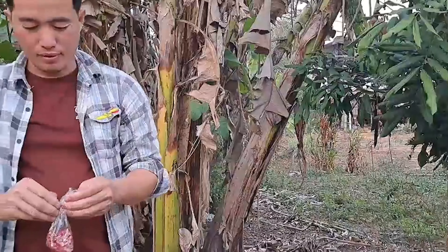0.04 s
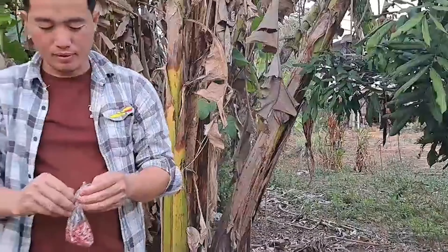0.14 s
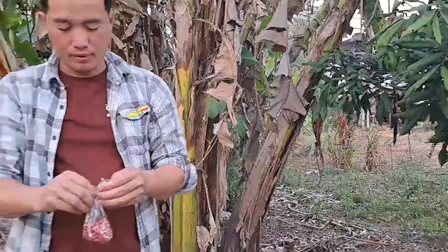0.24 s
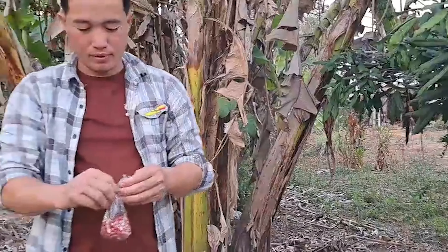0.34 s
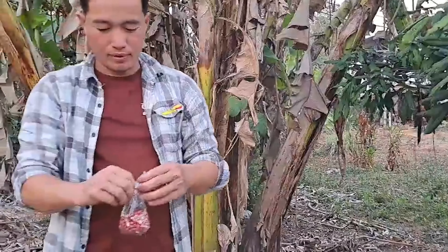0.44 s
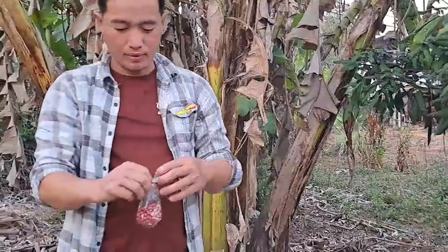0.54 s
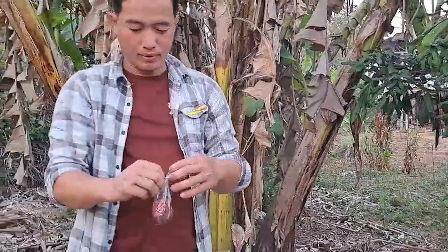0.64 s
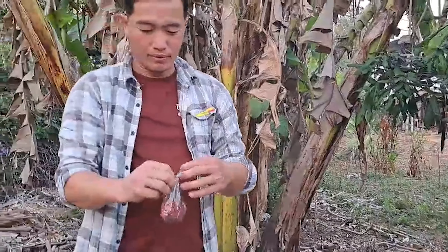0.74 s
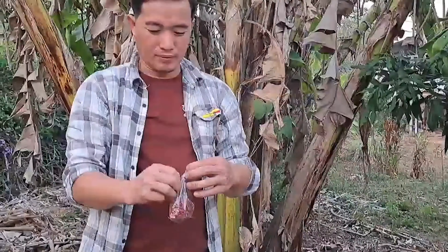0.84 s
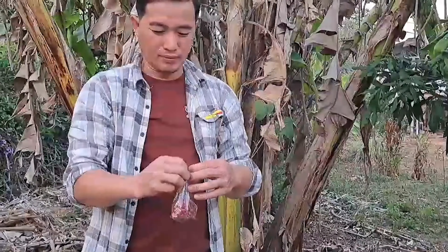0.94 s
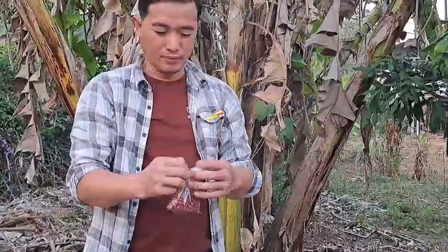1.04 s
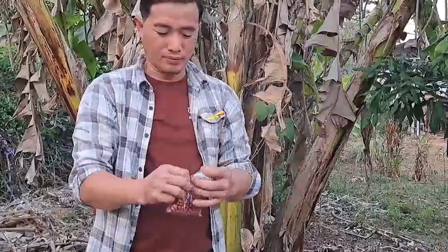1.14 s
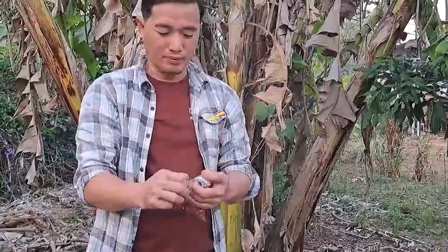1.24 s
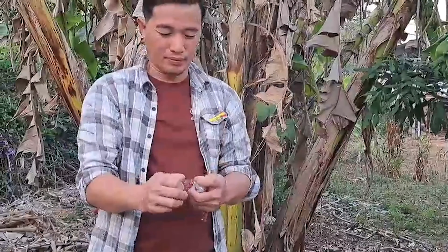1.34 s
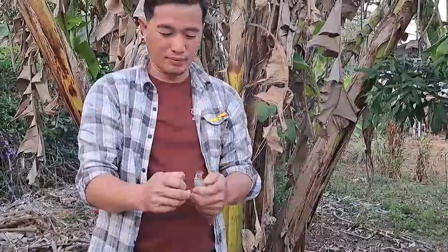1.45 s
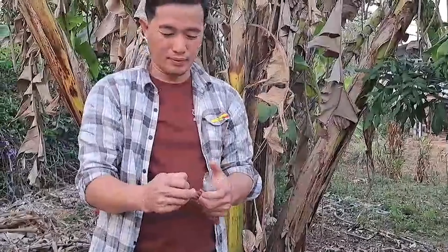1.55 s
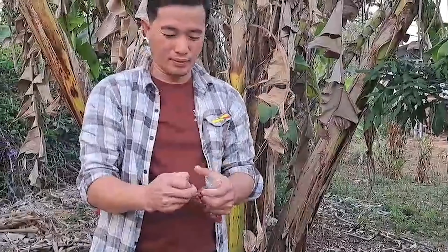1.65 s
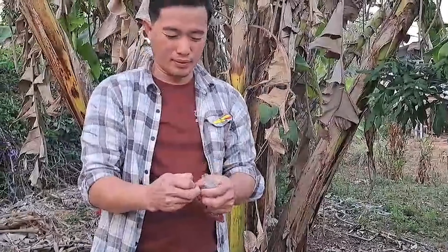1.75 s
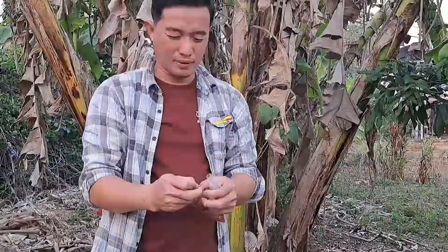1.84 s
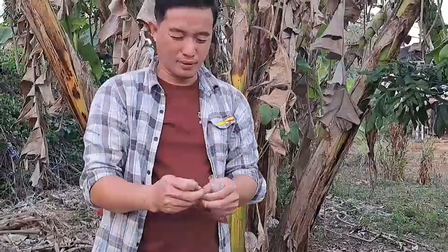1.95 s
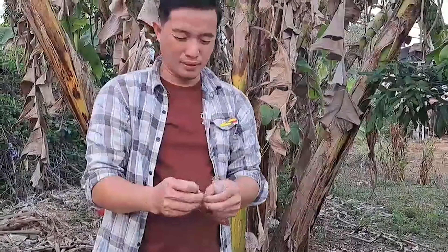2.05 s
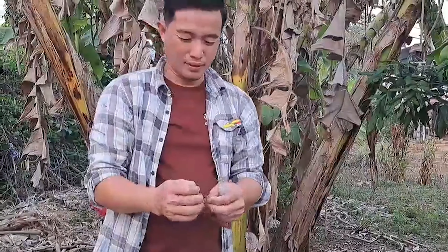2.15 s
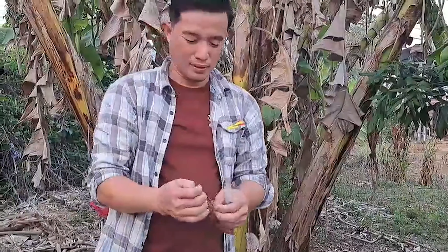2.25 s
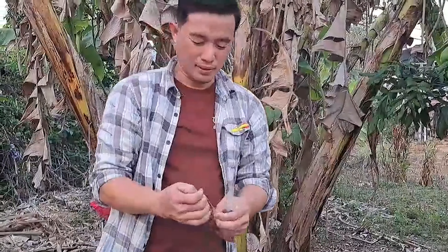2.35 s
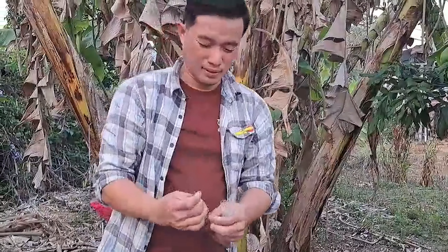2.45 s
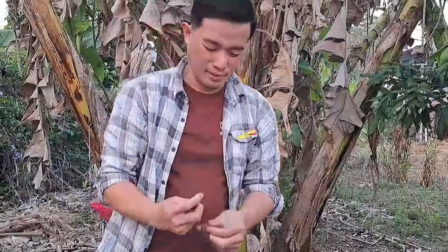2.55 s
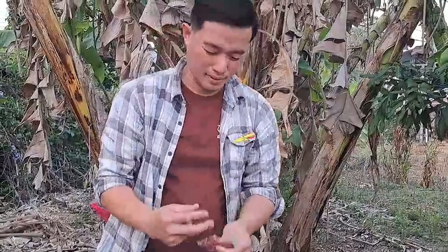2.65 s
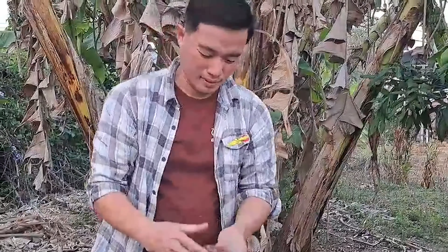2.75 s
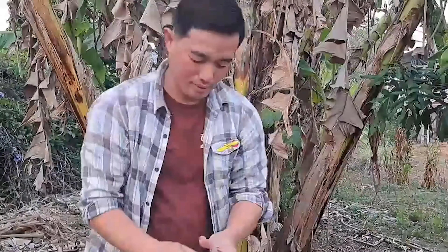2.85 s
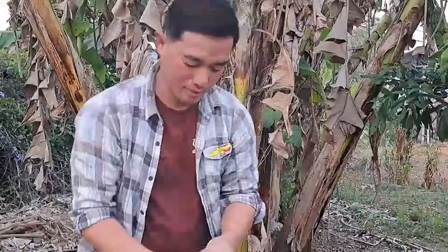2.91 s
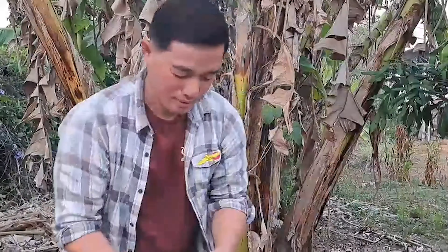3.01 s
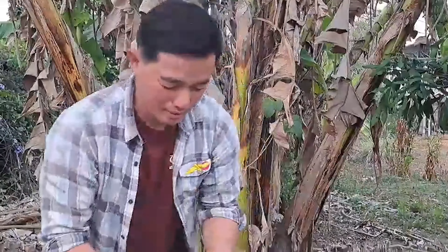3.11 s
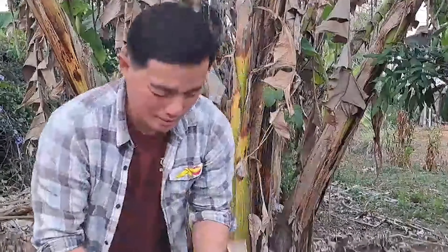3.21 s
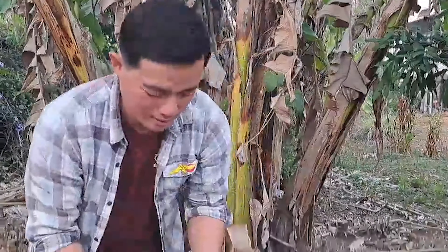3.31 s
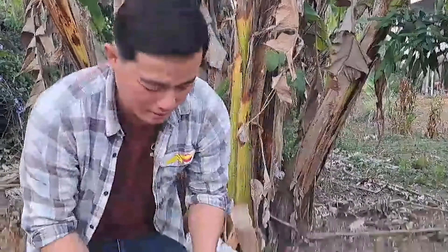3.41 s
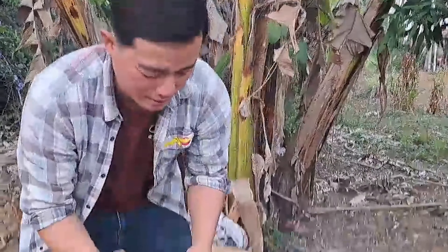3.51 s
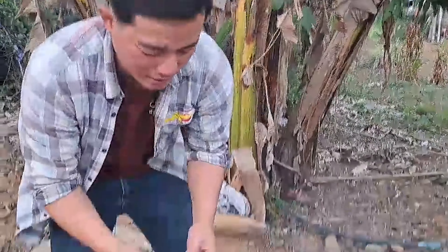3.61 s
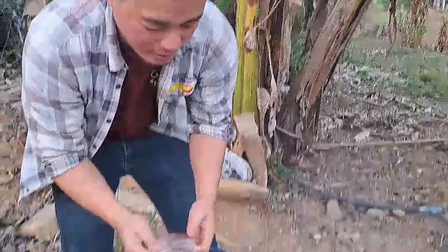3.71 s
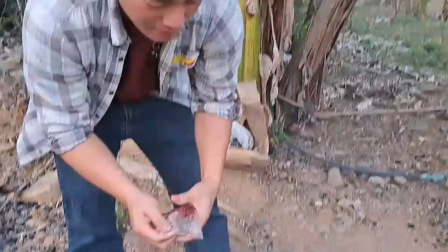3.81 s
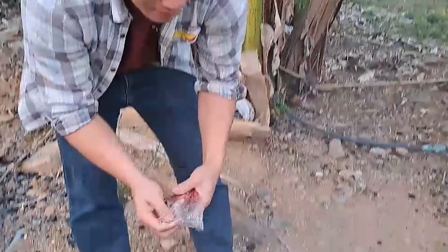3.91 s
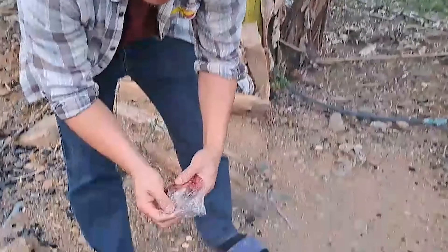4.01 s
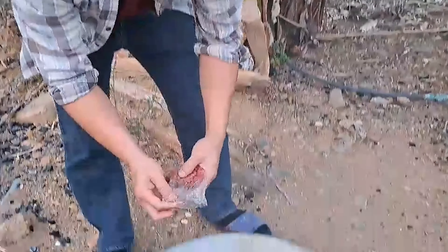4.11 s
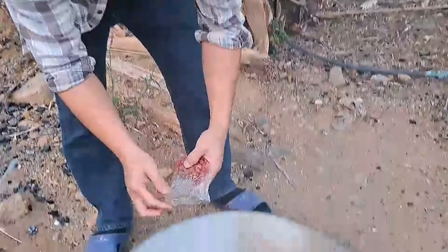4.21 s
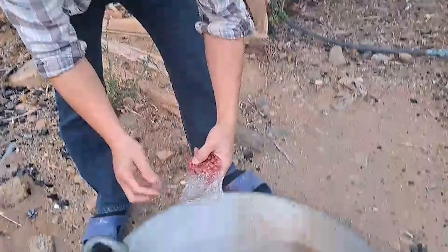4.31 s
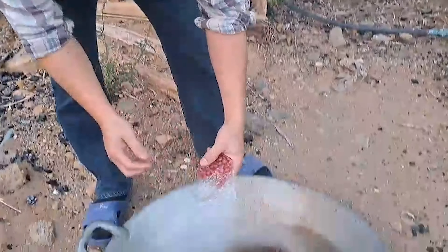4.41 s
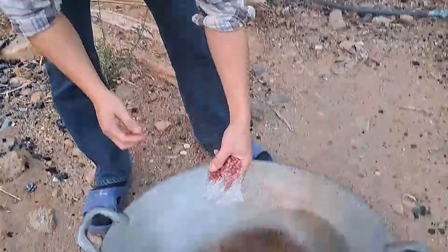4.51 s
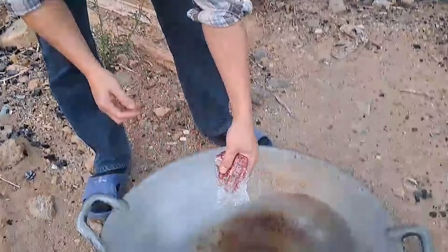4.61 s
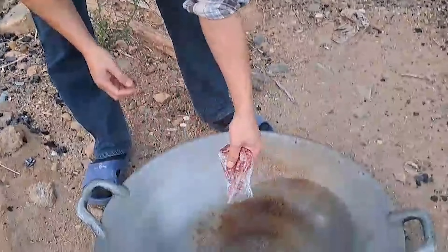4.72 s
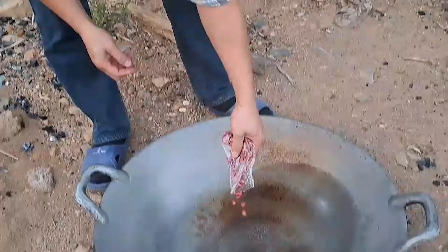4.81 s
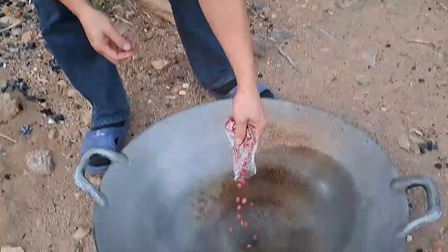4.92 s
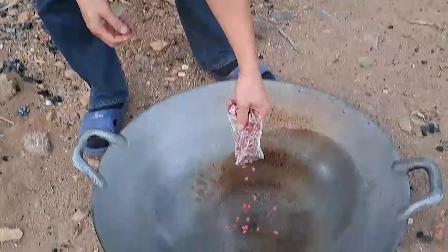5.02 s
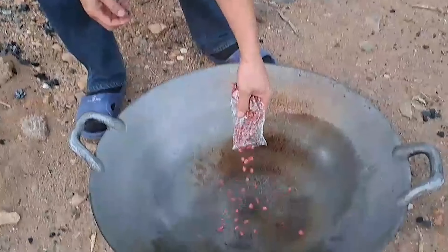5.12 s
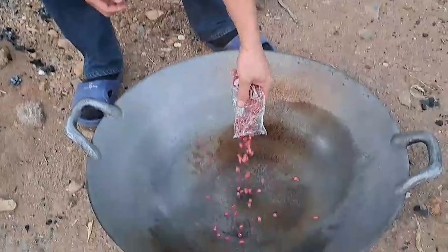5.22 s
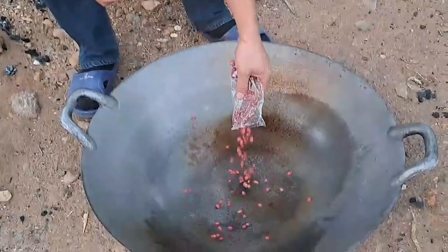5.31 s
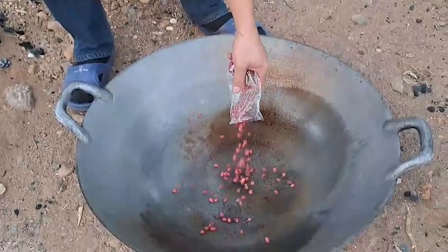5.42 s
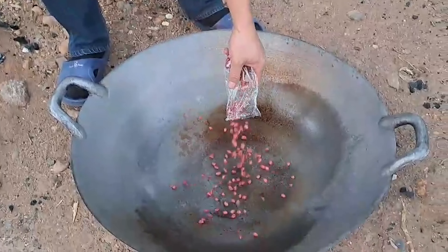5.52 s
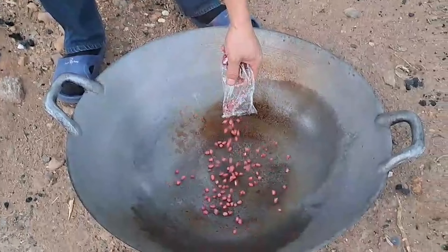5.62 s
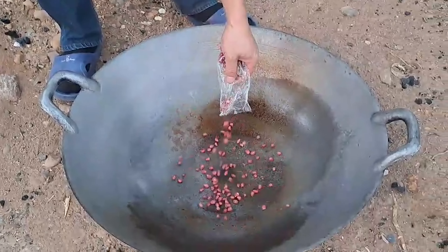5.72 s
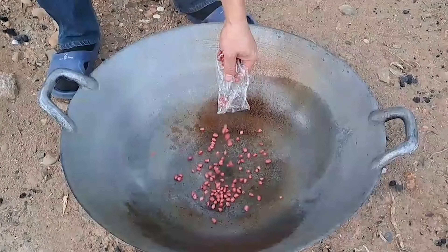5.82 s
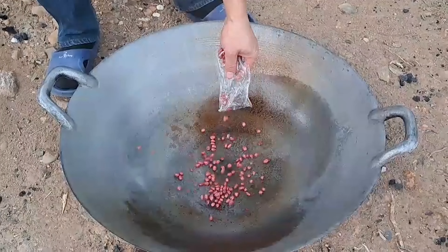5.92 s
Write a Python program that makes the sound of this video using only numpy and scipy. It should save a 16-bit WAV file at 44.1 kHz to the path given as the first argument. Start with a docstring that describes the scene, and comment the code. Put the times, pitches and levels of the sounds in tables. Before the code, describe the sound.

A quiet outdoor place with low distant traffic: a wavering engine drone, soft rumble and tyre hiss that fades after 1.5 s. Faint thin bird whistles glide at 0.6, 0.9 and 2.2 s. From the start, sleeves rustle and a thin plastic bag gives small dry snaps, busiest at 1.0-1.4 s, with a muted knock of nuts at 1.4 s. It calms around 2-2.7 s, then the shirt swishes dully from 2.9 s as the person bends. Crinkling grows closer and sharper from 3.8 s, peaking around 4.6-4.7 s with a nut knock; a faint husky hoot sounds at 4.7-4.9 s. At 5.0 s the first peanuts strike a large steel wok with hard, bright clanks, quickly becoming uneven gushes of bouncing hits. Clear metallic modes ring together over a faint bottom thud, slightly duller as nuts cover the steel, continuing until the end at 6 s.

```python
"""Peanuts poured into a wok

Outdoors, someone opens a small plastic bag, bends down and pours peanuts into a large steel wok.
Bag and clothes rustle as filtered noise that crinkles, snaps and knocks; then single nuts strike the pan
and swell to a stream of bouncing hits, each a noisy clank that also rings the pan's clear modes.
Wavering sines make a far engine drone and a short hoot, shaped noise makes air, rumble and fading road,
and gliding sines make a small bird's faint whistles."""
import sys
import numpy as np
from scipy import signal
from scipy.fft import rfft, irfft, next_fast_len
from scipy.io import wavfile

SR = 44100
rng = np.random.default_rng(int(sys.argv[2]) if len(sys.argv) > 2 else 0)


def generate_wav(sig):
    """Save sig (samples, or channels by samples) to the path in sys.argv[1] as 16-bit PCM at SR."""
    pcm = np.round(np.clip(np.atleast_2d(sig).T, -1, 1) * 32767).astype(np.int16)
    wavfile.write(sys.argv[1], SR, pcm)


N = 262766
TIME = np.arange(N) / SR

# Levels in the tables are relative: each source trims its layers with gains of its own.

# Movements of arms and hands. Each row: start in seconds, length in seconds, cloth level in dB,
# plastic film level in dB.
HAND_MOVES = [(0, 0.6, -52, -73), (0.439, 0.31, -60, -66), (0.857, 0.13, -54, -68),
              (1.035, 0.47, -50.5, -56), (1.347, 0.052, -44.5, -50.5), (1.545, .36, -57.5, -66),
              (2.18, 0.043, -74, -72), (2.596, .2, -63, -73), (2.801, 0.057, -54, -68),
              (2.858, 2.16, -47, -55), (2.897, 0.066, -44.5, -45), (3.075, 0.15, -46, -44.5),
              (3.301, 0.035, -55, -47), (3.466, 0.13, -46.5, -47), (3.543, .26, -42.5, -46.5),
              (3.837, 0.077, -46, -51), (4.083, 0.15, -44.5, -49), (4.288, 0.02, -46.5, -46.5),
              (4.55, 0.19, -42.5, -48.5), (4.635, 0.023, -42, -46), (4.774, 0.052, -39.5, -45)]
# The shirt swishes dully as its wearer bends down: start in seconds, length in seconds, level in dB.
BEND_SWISH = (2.87, 0.95, -53)
# Sharp creases of the bag. Each row: time in seconds, level in dB.
BAG_CREASES = [(0.2673, -47), (0.4876, -39), (0.5316, -40.5), (0.615, -41.5), (0.718, -39.5), (0.8994, -45),
               (1.035, -34.5), (1.1094, -34.5), (1.1471, -34), (1.1846, -34.5), (1.255, -34.5),
               (1.363, -34), (1.6044, -44), (1.6267, -42.5), (1.732, -41), (2.1944, -51.5), (2.4957, -50.5),
               (2.6803, -46), (2.8221, -42.5), (2.9974, -45), (3.2151, -41), (3.3265, -38), (3.4241, -48),
               (3.8452, -33), (3.9813, -36), (4.0652, -31.5), (4.2448, -35), (4.2832, -31.5), (4.313, -28),
               (4.4124, -31), (4.5052, -30.5), (4.5655, -38), (4.588, -26.5), (4.6143, -29), (4.6395, -26),
               (4.6602, -21), (4.6872, -22), (4.7857, -30), (4.8609, -27.5), (4.9048, -28)]
# Nuts knocking together inside the bag. Each row: time in seconds, level in dB.
BAG_KNOCKS = [(1.401, -22), (1.414, -30), (1.8755, -33.5), (4.166, -25.5), (4.72, -26.5)]
# Colours of cloth, plastic film and knocking nuts. Each row: frequency in Hz, density in dB per Hz.
CLOTH_COLOUR = [(250, 0), (450, -1), (1500, 2), (2500, 0), (4500, -15.5), (9000, -39.5)]
FILM_COLOUR = [(1200, -5), (2500, -2), (4200, 4), (7500, 3), (9200, -4), (12500, 0), (14000, 0),
               (15500, -32.5)]
NUT_KNOCK_COLOUR = [(300, -41), (1000, 6), (1900, 6), (3500, -0.5), (7000, -11), (15000, -13)]
# Far traffic. Each row: time in seconds, low engine boom in dB, rumble in dB.
TRAFFIC_LEVELS = [(0, -51, -50), (.75, -57, -50), (1.4, -54, -54), (2.45, -53.5, -59), (2.85, -55, -53),
                  (3.2, -51.5, -54.5), (3.65, -46, -52), (4.45, -45, -51.5), (4.95, -47, -47),
                  (5.96, -44.5, -51)]
# A far motor whose pitch dips, climbs and settles. Each row: time in seconds, pitch in Hz, level in dB.
MOTOR_GLIDE = [(0, 219, -50), (.2, 193.5, -50), (.45, 218, -55), (.7, 254.4, -52), (1.2, 242.8, -61.5),
               (2.4, 246, -68), (3.1, 247.1, -60), (5.96, 242.4, -58)]
# The engine's firing tone swells and sinks. Each row: middle in seconds, length in seconds, level in dB.
ENGINE_SWELLS = [(.75, 0.5, -48), (1.34, 0.42, -43.5), (3.67, .35, -52), (4.12, .5, -45.5),
                 (4.719, 0.49, -42), (5.55, 1.6, -43)]
# Colours of traffic rumble, open air and tyres. Each row: frequency in Hz, density in dB per Hz.
RUMBLE_COLOUR = [(25, -15), (45, 0.5), (90, 1), (180, -1), (250, -4.5), (340, -10), (500, -18.5),
                 (900, -28)]
AIR_COLOUR = [(200, -14.5), (400, -1), (700, 2.5), (1000, -5), (1500, -9), (3000, -23.5), (5000, -40),
              (14000, -32)]
ROAD_COLOUR = [(500, -16), (1000, 1.5), (1600, -1.5), (2300, -0.5), (3100, -12.5), (4500, -12),
               (6500, -23.5), (10000, -37)]
# Bird whistles. Each row: start in seconds, length in seconds, start pitch in Hz, end pitch in Hz,
# level in dB.
BIRD_WHISTLES = [(0.595, .19, 4400, 3700, -63), (0.878, 0.19, 3620, 4240, -63.5),
                 (2.173, 0.106, 6000, 5800, -72), (2.24, .1, 6640, 7140, -79)]
# A brief soft hoot. Each row: time in seconds, pitch in Hz, level in dB.
HOOT_GLIDE = [(4.66, 500, -90), (4.74, 503, -55), (4.8, 549, -49.5), (4.86, 582, -52), (4.94, 545, -90)]
# Nuts landing in the wok. Each row: time in seconds, strength in dB, treble against the low ring in dB.
LANDINGS = [(4.9921, -17.5, -6.5), (5.0131, -13, -7), (5.045, -11, -23), (5.0493, -15, 1.5),
            (5.0635, -14, -3.5), (5.0786, -14.5, -2.5), (5.092, -11, -8), (5.1319, -15.5, 3.5),
            (5.153, -12.5, -5.5), (5.1995, -18.5, 4.5), (5.2364, -20.5, -4), (5.2844, -13.5, -4),
            (5.2981, -13, 0), (5.3473, -11.5, -6.5), (5.3707, -22, -5), (5.386, -16, -3),
            (5.5051, -14, -10), (5.5208, -14, -32), (5.5474, -21, -15), (5.6222, -14, -5.5),
            (5.664, -15.5, -2.5), (5.6993, -11.5, -28), (5.772, -18, -15), (5.809, -21.5, 1),
            (5.9324, -15, -16)]
# The nuts leave the bag in gushes. Each row: start in seconds, length in seconds, level in dB.
NUT_GUSHES = [(5.039, 0.047, -30), (5.138, 0.19, -25), (5.346, .23, -19), (5.601, 0.24, -21),
              (5.828, 0.084, -23)]
# The wok's clearest modes. Each row: frequency in Hz, rms level in dB, 60 dB decay time in seconds.
CLEAR_MODES = [(1264, -32.5, .45), (1378, -44, .2), (1405, -39.5, .25), (1539, -33, .42), (1600, -45, .2),
               (1653, -48, .35), (1782, -46, .5), (1868, -43.5, .2), (2090, -44, .12), (2179, -43.5, .18),
               (2245, -43, .2), (2432, -46, .3), (2632, -45, .4), (2789, -50, .3), (2935, -42.5, .3),
               (3052, -47, .3), (3263, -46, .3), (3611, -48, .35), (3762, -47.5, .35), (3908, -46.5, .25),
               (4048, -49, .3), (4113, -49, .3), (4391, -45, .25), (4739, -43, .18), (5093, -46.5, .16),
               (5300, -48, .06), (6363, -49, .1), (6815, -54, .12), (7278, -57, .15), (7790, -55, .12)]
# The wok's crowd of short, overlapping modes. Each row: frequency in Hz, density in dB per Hz.
CLANK_COLOUR = [(1200, 1.5), (1450, 8), (1750, 0), (2200, 3), (2900, 1), (3500, -2.5), (5000, 3.5),
                (6500, -2.5), (8000, -7), (8900, -17.5), (10000, -15.5), (14000, -22)]
# The faint thud of the pan's bottom. Each row: frequency in Hz, density in dB per Hz.
THUD_COLOUR = [(180, -6), (280, 6), (400, -1), (600, -6), (900, -11.5)]
# Ring of the clear modes: gain in dB, phase spread between the ears in radians at the ring frequency.
MODE_RING = (3.4, .22)
# Left-right likeness of diffuse sound. Each row: frequency in Hz, correlation from -1 to 1.
EAR_LIKENESS = [(60, 0.96), (130, 0.94), (290, 0.88), (640, 0.45), (1400, 0.095), (3000, 0.25),
                (7000, 0.074), (15000, 0)]

MOVE_RISE_S, MOVE_FALL_DB_PER_S = 0.027, 215
FINGERS_DB = -79.5  # the film is never quite still in the hand
AIR_DB = -57.5  # steady murmur of the open air
# tyre noise sinks slowly, then fast once the vehicle has gone by
ROAD_DB, ROAD_SINK_DB_PER_S, ROAD_GONE_S, ROAD_FADE_DB_PER_S = -51, 4, 1.46, 36
GUSH_RISE_S, GUSH_FALL_DB_PER_S = 0.016, 220
# the treble of the bounces dulls as nuts cover the steel
BARE_PAN_TREBLE_DB, DULLING_DB_PER_S = 0, 5
RING_HZ = 1195  # ring frequency of the curved shell
CUTOFF_HZ = 14250


def from_db(db):
    """Decibels to an amplitude factor."""
    return 10 ** (np.asarray(db) / 20)


def rms_one(x):
    """Scales a sound to rms 1."""
    return x / np.sqrt(np.mean(x ** 2) + 1e-20)


def in_time(rows):
    """Each column of a curve, sample by sample."""
    s, *columns = np.transpose(rows)
    return [np.interp(TIME, s, column) for column in columns]


def at_hz(points, hz):
    """Reads a spectrum on a log-frequency axis."""
    f, value = np.transpose(points)
    return np.interp(np.log(hz + 1), np.log(f), value)


def drift(rate):
    """Slow chance with spread near 1, from random knots at a rate in Hz."""
    knots = rng.standard_normal(int(N / SR * rate) + 3)
    return np.interp(TIME * rate, np.arange(len(knots)), knots) / np.sqrt(2 / 3)


def coloured(spectrum, size=N):
    """Stereo noise of a given colour, alike in both ears in the bass; rms 1."""
    padded = next_fast_len(size, True)
    hz = np.fft.rfftfreq(padded, 1 / SR)
    mid, side = rfft(rng.standard_normal((2, padded)))
    alike = np.clip(at_hz(EAR_LIKENESS, hz), -1, 1)
    pair = np.sqrt(1 + alike) * mid + np.sqrt(1 - alike) * side * [[1], [-1]]
    # beyond the ends of the table the colour falls off at 12 dB per octave
    low_skirt = np.minimum(1, hz / spectrum[0][0]) ** 2
    high_skirt = np.minimum(1, spectrum[-1][0] / (hz + 1)) ** 2
    shaped = pair * from_db(at_hz(spectrum, hz)) * low_skirt * high_skirt
    return rms_one(irfft(shaped, padded)[:, :size])


def dying(t60, size):
    """An exponential decay that loses 60 dB in t60 seconds."""
    return from_db(-60 * TIME[:size] / t60)


def add(out, s, sound):
    """Mixes a short sound in at time s."""
    start = min(max(round(s * SR), 0), N - 1)
    out[:, start:start + sound.shape[1]] += sound[:, :N - start]


def swell(s, start, length, rise_s, fall_db_per_s):
    """Gain at times s of a movement that rises, holds and dies away."""
    rise = np.clip((s - start) / rise_s, 0, 1)
    return rise * from_db(-fall_db_per_s * np.maximum(s - start - length, 0))


def handling():
    """How strongly cloth and film are stirred; overlapping movements add in power."""
    cloth, film = np.zeros(N), np.full(N, from_db(FINGERS_DB) ** 2)
    for start, length, cloth_db, film_db in HAND_MOVES:
        power = swell(TIME, start, length, MOVE_RISE_S, MOVE_FALL_DB_PER_S) ** 2
        cloth += power * from_db(cloth_db) ** 2
        film += power * from_db(film_db) ** 2
    return np.sqrt(cloth), np.sqrt(film)


def crinkle(per_s, spread_db, t60, smooth):
    """Envelope of many tiny buckles over a smooth slide; mean power 1."""
    buckles = rng.exponential(1, N)
    sizes = from_db(spread_db * np.minimum(buckles, 4)) * (rng.random(N) < per_s / SR)
    # each buckle's power dies by 60 dB in t60 seconds
    power = signal.lfilter([1], [1, -from_db(-120 / (t60 * SR))], sizes ** 2 + 1e-18)
    share = np.clip(smooth, 0, 1)
    return np.sqrt(share + (1 - share) * power / power.mean())


def snaps(rows, colour, t60, tail_db, tail_t60, size=4096):
    """Short dry ticks of dying noise with a weaker, longer tail."""
    out = np.zeros((2, N))
    for s, level_db in rows:
        tick = coloured(colour, size=size) * dying(t60, size)
        tail = coloured(colour, size=size) * dying(tail_t60, size) * from_db(tail_db)
        tick_peak = np.abs(tick.mean(axis=0)).max()
        add(out, s, from_db(level_db) * (tick / tick_peak + tail))
    return out


def rustle(cloth_gain_db=-5.0, film_gain_db=2.0):
    """Sleeves slide, the shirt swishes, the thin bag crinkles and snaps, nuts knock together inside it."""
    cloth_stir, film_stir = handling()
    cloth = cloth_stir * from_db(cloth_gain_db) * coloured(CLOTH_COLOUR)
    cloth = cloth * crinkle(per_s=400, spread_db=3.2, t60=0.0093, smooth=0.54)

    bend_s, bend_length, bend_db = BEND_SWISH
    bend = swell(TIME, bend_s, bend_length, MOVE_RISE_S, MOVE_FALL_DB_PER_S)
    swish = from_db(bend_db) * bend * coloured(AIR_COLOUR)  # as dull as the open air

    film = film_stir * from_db(film_gain_db) * coloured(FILM_COLOUR)
    film = film * crinkle(per_s=420, spread_db=4.4, t60=0.0036, smooth=0.55)

    creases = snaps(BAG_CREASES, FILM_COLOUR, t60=0.0019, tail_db=-6.5, tail_t60=0.027)
    knocks = snaps(BAG_KNOCKS, NUT_KNOCK_COLOUR, t60=0.03, tail_db=-14, tail_t60=0.073)
    return cloth + swish + film + from_db(-1.5) * creases + from_db(-5.0) * knocks


def wavering(hz, wander, waver_db, rate):
    """A distant tone whose phase (rad) and level waver on the way; rms 1."""
    phase = 2 * np.pi * np.cumsum(hz * np.ones(N)) / SR + wander * drift(rate)
    return rms_one(np.sin(phase) * from_db(waver_db * drift(rate)))


def engine(first_hz=132.8, last_hz=127.0, boom_hz=59.4, tone_db=-57.0, swell_gain_db=-4.0, boom_gain_db=0.5):
    """Distant exhausts: a slowly sinking firing tone over a low boom, and a second, gliding motor."""
    swells = np.zeros(N)
    for middle, length, db in ENGINE_SWELLS:
        arch = np.cos(np.pi * np.clip((TIME - middle) / length, -.5, .5))
        swells += from_db(db + swell_gain_db) * arch
    firing_hz = np.linspace(first_hz, last_hz, N)
    tone = (from_db(tone_db) + swells) * wavering(firing_hz, wander=0.56, waver_db=2.5, rate=18)

    boom_db, _ = in_time(TRAFFIC_LEVELS)
    boom = from_db(boom_db + boom_gain_db) * wavering(boom_hz, wander=.6, waver_db=2.0, rate=16)

    motor_hz, motor_db = in_time(MOTOR_GLIDE)
    motor = from_db(motor_db) * wavering(motor_hz, wander=0.5, waver_db=4.0, rate=30)
    return tone + boom + motor


def outdoors(rumble_gain_db=5.5):
    """Traffic rumble, open air and the hiss of far tyres, each a noise of its own colour."""
    _, rumble_db = in_time(TRAFFIC_LEVELS)
    rumble = from_db(rumble_db + rumble_gain_db) * coloured(RUMBLE_COLOUR)
    air = from_db(AIR_DB) * coloured(AIR_COLOUR)
    fade_db = ROAD_FADE_DB_PER_S * np.maximum(TIME - ROAD_GONE_S, 0)
    road_db = ROAD_DB - ROAD_SINK_DB_PER_S * TIME - fade_db
    return rumble + air + from_db(road_db) * coloured(ROAD_COLOUR)


def bird():
    """Thin gliding whistles: sines that swell and fade in a smooth arch."""
    out = np.zeros((2, N))
    for s, length, start_hz, end_hz, level_db in BIRD_WHISTLES:
        pitch = np.linspace(start_hz, end_hz, int(length * SR))
        whistle = np.sin(2 * np.pi * np.cumsum(pitch) / SR)
        add(out, s, from_db(level_db) * np.hanning(len(pitch)) * whistle[None])
    return out


def hoot():
    """A short, husky note that glides up and sags at the end."""
    hz, level_db = in_time(HOOT_GLIDE)
    return from_db(level_db) * wavering(hz, wander=1.0, waver_db=2.5, rate=70)


def flow(s):
    """How fully the nuts stream at times s, as a gain: the strongest gush counts."""
    gushes = [from_db(db) * swell(s, start, length, GUSH_RISE_S, GUSH_FALL_DB_PER_S)
              for start, length, db in NUT_GUSHES]
    return np.max(gushes, axis=0)


def bounces(count=100, spread_db=0.5, low_gain_db=-10.6, high_gain_db=-9.5):
    """Nuts bounce at uneven times, as hard as the gush is full: rows of (s, low ring dB, treble dB)."""
    jitter, force, hardness = rng.uniform(-1, 1, (count, 3)).T
    first = NUT_GUSHES[0][0]
    s = np.interp(np.arange(count) + jitter, [0, count], [first, N / SR])
    strength_db = 20 * np.log10(flow(s) + 1e-9) + spread_db * force
    treble_db = BARE_PAN_TREBLE_DB - DULLING_DB_PER_S * (s - first) + spread_db * hardness / 2
    return list(zip(s, strength_db + low_gain_db, strength_db + treble_db + high_gain_db))


def wok_spot(size=8192, split_hz=3200, count=56, patchy_db=4.0):
    """The clank of one spot of the wok, which favours modes of its own: low part and treble, rms 1 at first."""
    hz = np.geomspace(CLANK_COLOUR[0][0], CLANK_COLOUR[-1][0], count)
    patchy = at_hz(CLANK_COLOUR, hz) + patchy_db * rng.standard_normal(count)
    fading = dying(.036, size) + from_db(-8) * dying(.12, size)
    clank = coloured(np.column_stack([hz, patchy]), size=size) * fading
    # a curved shell hardly radiates below its ring frequency
    clank = signal.sosfilt(signal.butter(9, RING_HZ, "high", fs=SR, output="sos"), clank)
    low = signal.sosfilt(signal.butter(4, split_hz, "low", fs=SR, output="sos"), clank)
    high = signal.sosfilt(signal.butter(4, split_hz, "high", fs=SR, output="sos"), clank)
    low = low + 0.065 * low[::-1]  # a little of each ear's long waves reaches the other
    # levelled by the first 20 ms
    return [part / np.sqrt(np.mean(part[:, :SR // 50] ** 2)) for part in (low, high)]


def wok_ring(hits):
    """Every hit drives each clear mode with a strength of its own; the ringing piles up."""
    ring_db, ears = MODE_RING
    s, low_db, high_db = np.transpose(hits)
    at = np.round((s - s.min()) * SR).astype(int)
    out = np.zeros((2, at.max() + SR // 10))
    for hz, level_db, t60 in CLEAR_MODES:
        # the force passes from the low level to the treble level between 2.5 and 4.5 kHz
        treble_share = np.interp(hz, [2500, 4500], [0, 1])
        force = from_db(treble_share * (high_db - low_db) + low_db)
        force = force * rng.choice([-1, 1], len(at)) * rng.uniform(0.43, 0.81, len(at))
        clicks = np.bincount(at, force, out.shape[1])
        # a complex one-pole resonator rings at the mode's pitch and decay
        pole = np.exp((2j * np.pi * hz - np.log(1000) / t60) / SR)
        swing = signal.lfilter([1], [1, -pole], clicks + 1e-18)
        # the ears hear long bending waves alike, short ones with unrelated phases
        apart = np.exp(1j * ears * (hz / RING_HZ) ** 1.5 * rng.standard_normal((2, 1)))
        out += from_db(level_db + ring_db) * rms_one((apart * swing).imag)
    return signal.sosfilt(signal.butter(8, [1190, 8500], "band", fs=SR, output="sos"), out)


def peanuts(count=32, land_low_db=-12.5, land_high_db=-9.0, thud_db=-30.5, thud_t60=0.22, drumming_db=-32.0):
    """Falling nuts strike the pan and thud its bottom; then they bounce on, many at once, and it drums softly."""
    spots = [wok_spot() for _ in range(count)]
    out = np.zeros((2, N))
    landings = [(s, db + land_low_db, db + treble_db + land_high_db) for s, db, treble_db in LANDINGS]
    hits = landings + bounces()
    for k, (s, low_db, high_db) in enumerate(hits):
        low, high = spots[k % count]
        add(out, s, from_db(low_db) * low + from_db(high_db) * high)
    for s, db, treble_db in LANDINGS:
        blow = from_db(db) * np.hypot(1, from_db(treble_db))
        thud = coloured(THUD_COLOUR, size=8192) * dying(thud_t60, size=8192)
        add(out, s, blow * from_db(thud_db) * thud)
    add(out, min(s for s, *_ in hits), wok_ring(hits))
    drumming = from_db(drumming_db) * flow(TIME) * coloured(THUD_COLOUR)
    return out + drumming


def scene(wok_pan_db=1.14, hands_pan_db=0.94):
    """The wok and the hands are a little to the right."""
    hands = rustle() * from_db([[-hands_pan_db], [hands_pan_db]])
    far = engine() + outdoors() + bird() + hoot()
    wok = peanuts() * from_db([[-wok_pan_db], [wok_pan_db]])
    return hands + far + wok


def record(dry):
    """The deepest bass and the top are cut."""
    no_sub = signal.sosfilt(signal.butter(2, 28, "high", fs=SR, output="sos"), dry)
    return signal.sosfilt(signal.ellip(9, .3, 90, CUTOFF_HZ, fs=SR, output="sos"), no_sub)


dry = scene()
out = record(dry)
generate_wav(out)
```